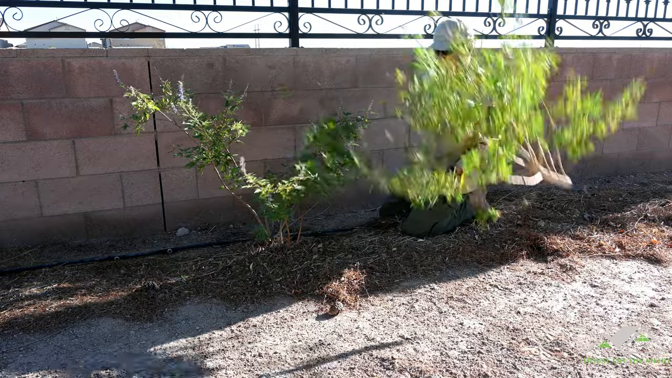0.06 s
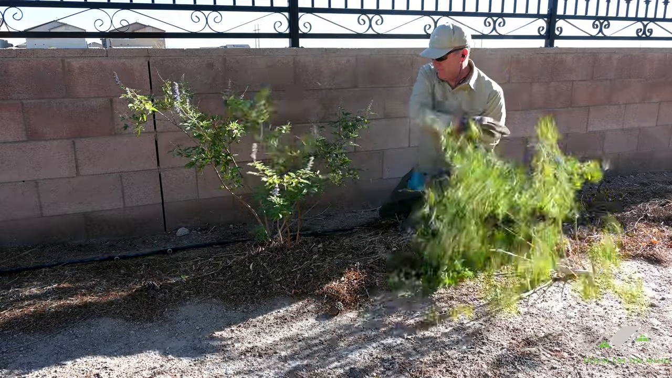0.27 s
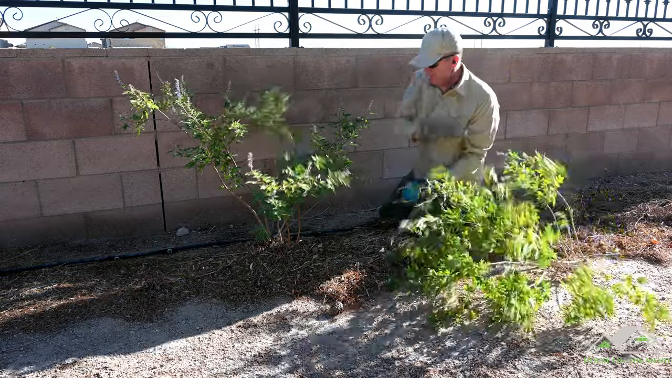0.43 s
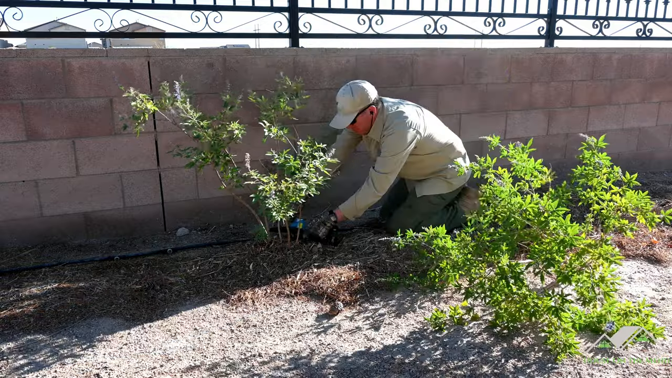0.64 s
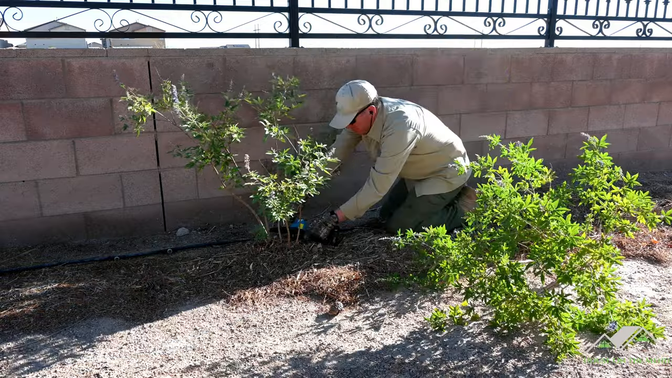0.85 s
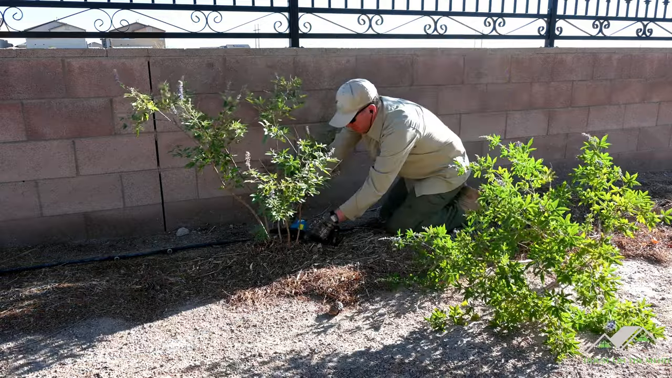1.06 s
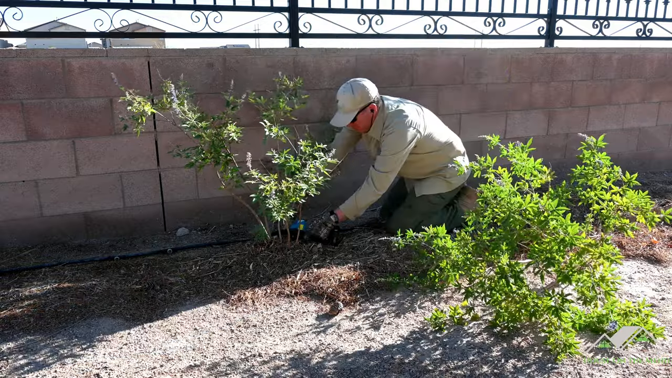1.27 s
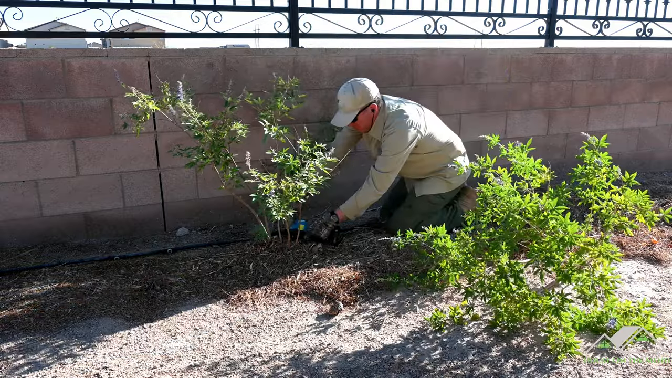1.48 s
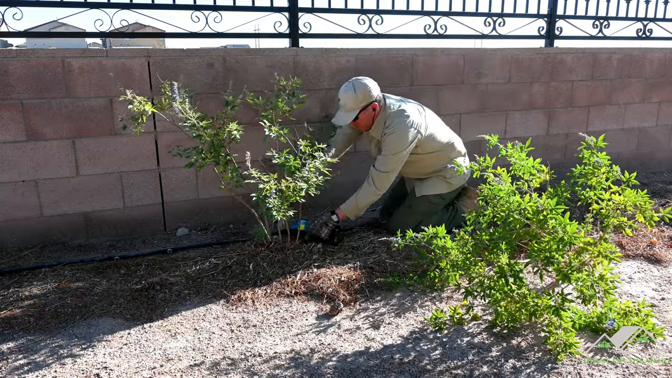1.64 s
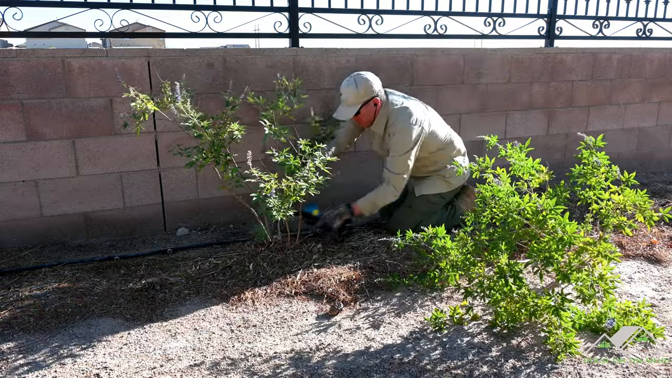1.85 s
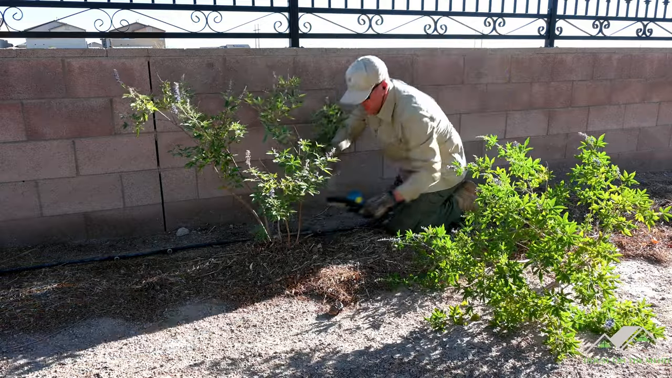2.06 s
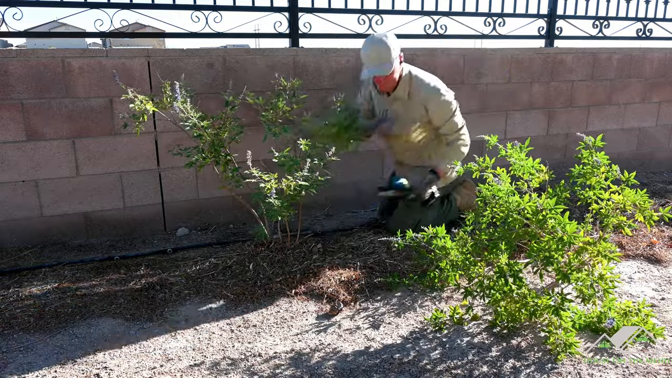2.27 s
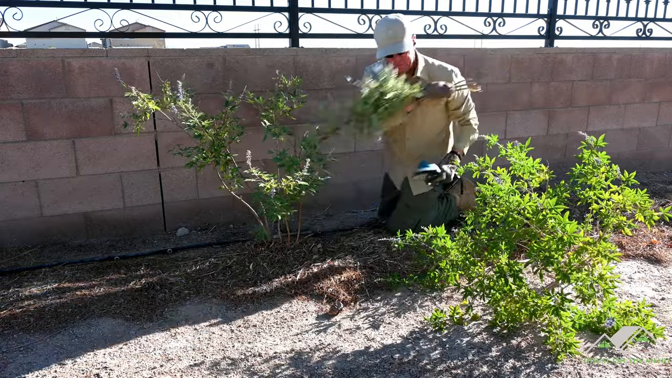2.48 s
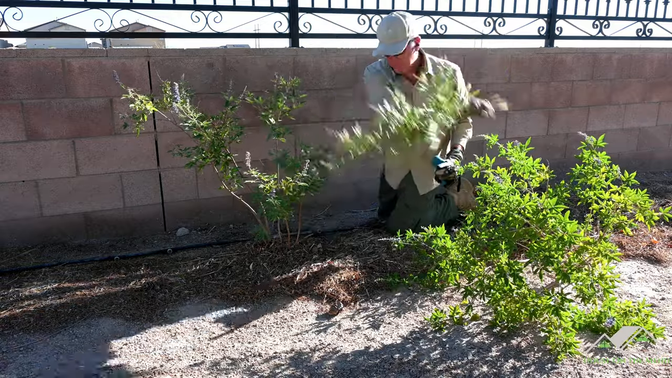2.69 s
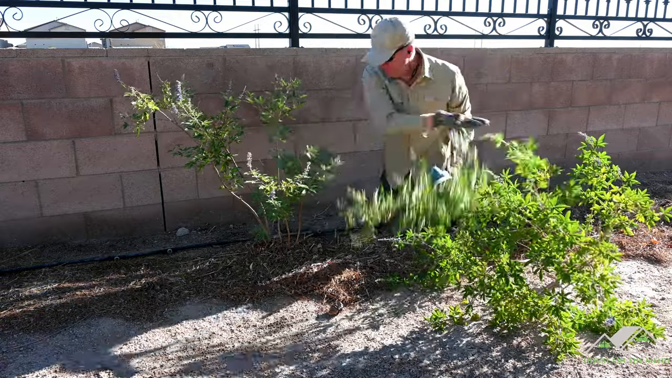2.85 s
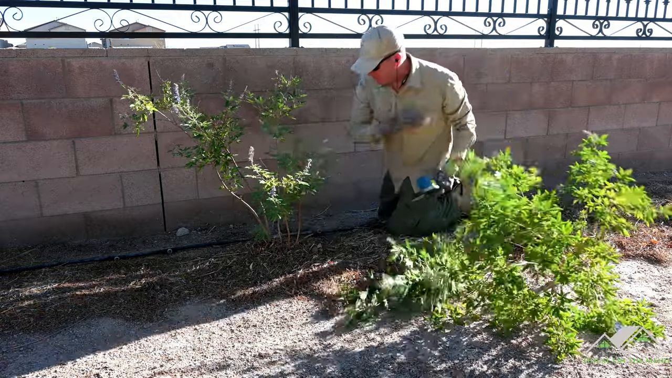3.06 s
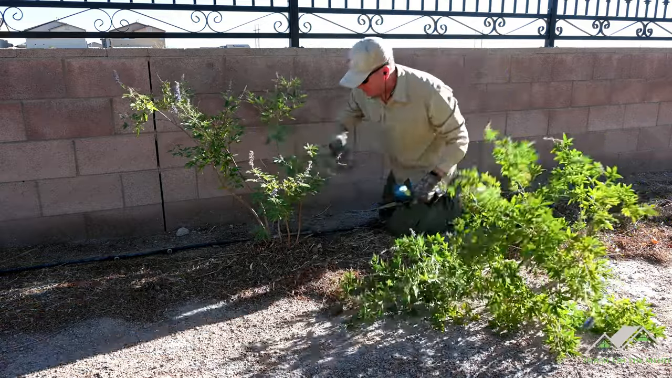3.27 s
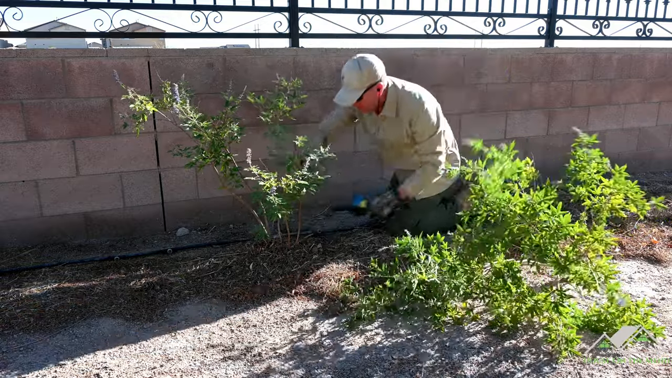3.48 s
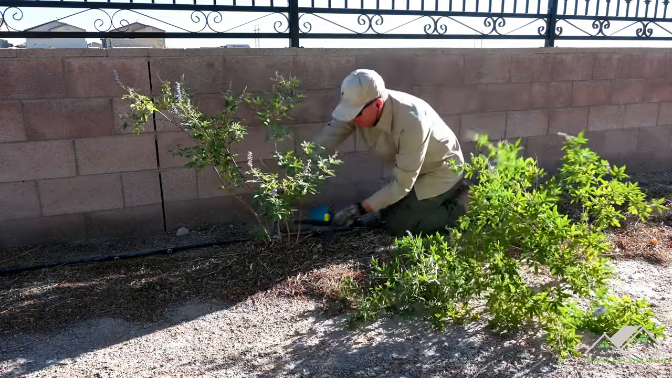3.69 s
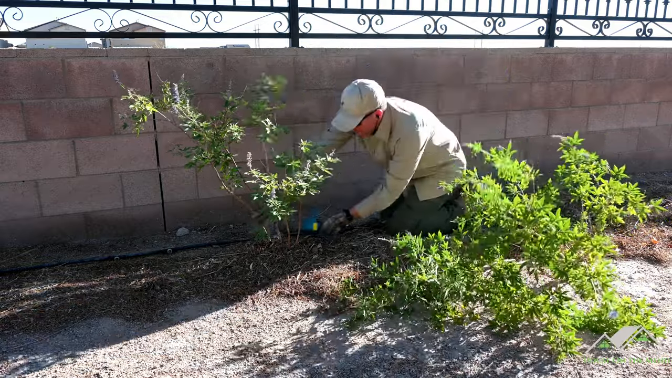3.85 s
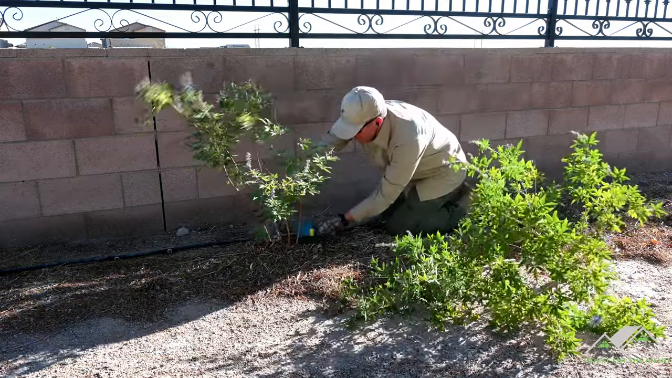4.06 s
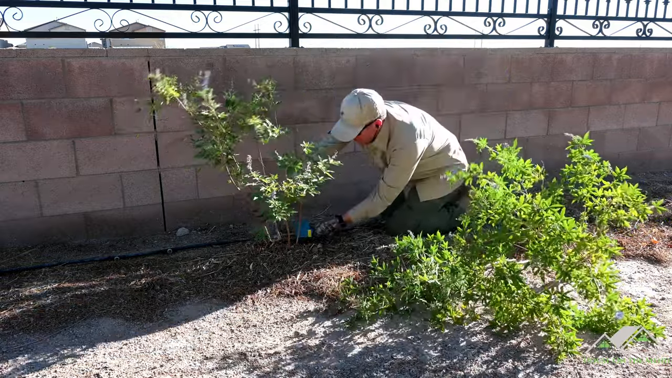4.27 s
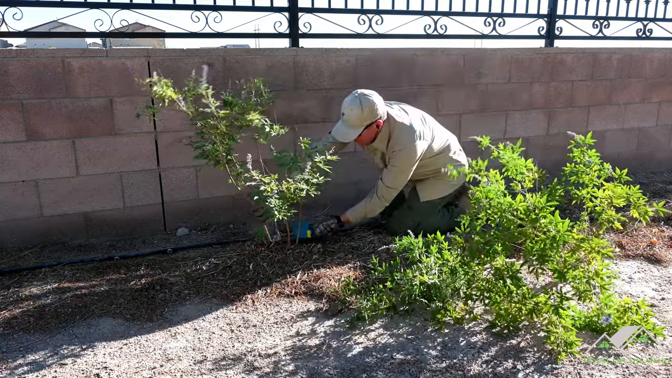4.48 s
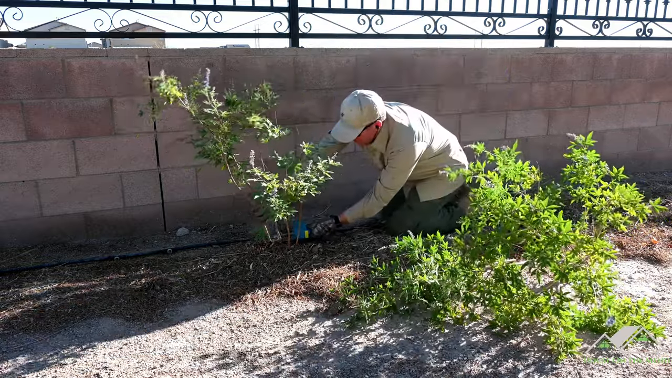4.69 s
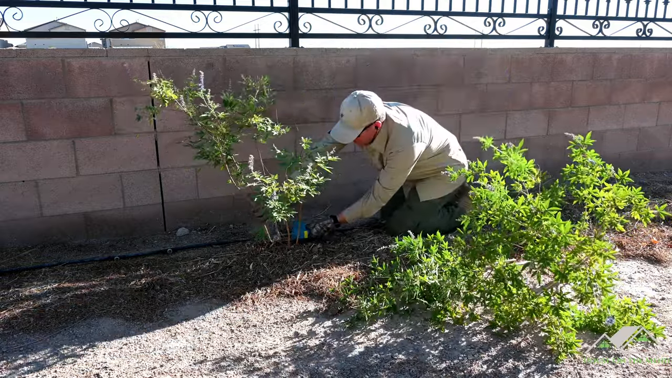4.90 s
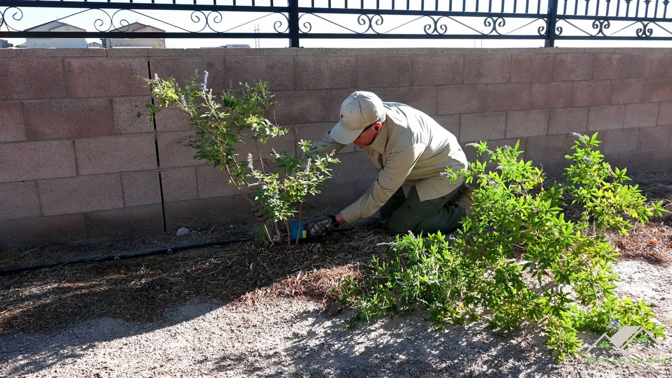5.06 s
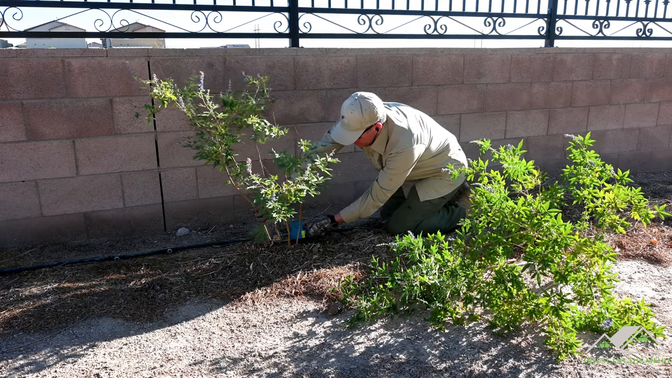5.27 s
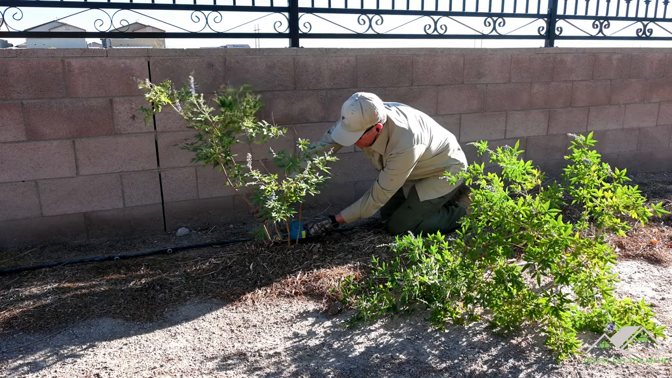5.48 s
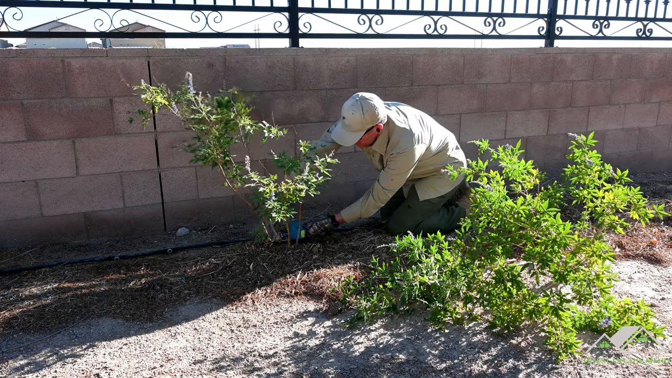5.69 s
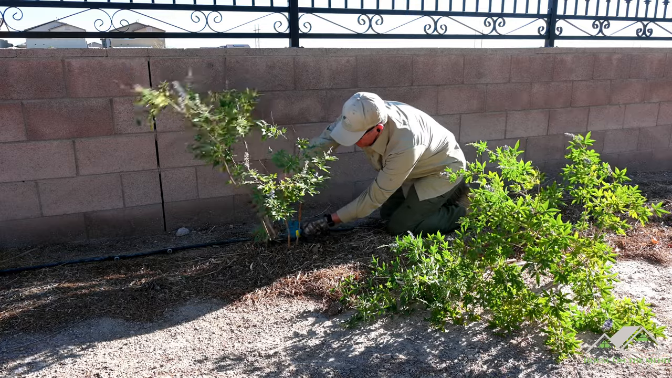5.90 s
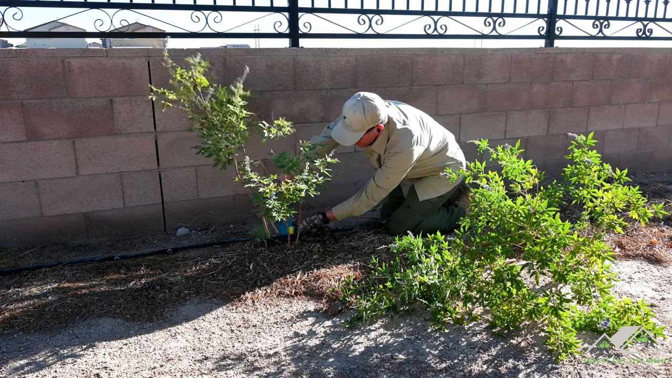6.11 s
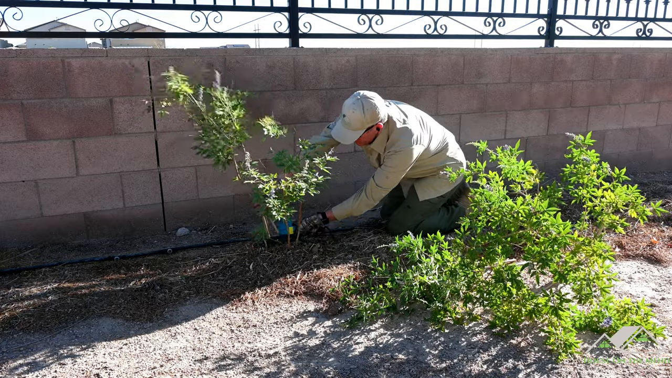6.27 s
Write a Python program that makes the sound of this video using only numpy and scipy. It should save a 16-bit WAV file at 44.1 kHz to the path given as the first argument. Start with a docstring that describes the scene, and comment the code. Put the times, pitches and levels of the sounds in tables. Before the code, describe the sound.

Outdoors, a branch drops with a soft rustle and a few twig knocks. A small electric chainsaw, several metres from the microphone, then cuts thin stems, its whine wavering and its chain clattering and snagging. It winds down to a stop, and more branches are tossed and brushed. A second burst follows, with sharp catches and a growing drone in the wood, over a faint hum of far traffic.

```python
"""Battery chainsaw by a block wall

A small saw cuts thin green stems in two bursts, a few metres from a mono microphone.
Drive links whine over the sprocket, the chain clatters round the bar, cutters bite and catch in wood.
Between the bursts the chain coasts to a stop, branches are thrown down and leaves rustle.
A town hums in the distance."""
import sys
import numpy as np
from scipy import signal
from scipy.fft import rfft, irfft, next_fast_len
from scipy.io import wavfile
from scipy.ndimage import uniform_filter1d, map_coordinates

SR = 44100
rng = np.random.default_rng(int(sys.argv[2]) if len(sys.argv) > 2 else 0)


def dump_mix(stems):
    """Bounce the given channels to the path in sys.argv[1] as a 16-bit WAV at rate SR."""
    frames = np.atleast_2d(stems).T  # one column per channel
    limited = np.clip(frames, -1, 1)  # hard clip at full scale
    pcm = np.round(limited * 32767).astype(np.int16)
    wavfile.write(sys.argv[1], SR, pcm)


N = 279594
T = np.arange(N) / SR


def saw():
    """The saw, a few metres off: whine, clatter and cutting all follow the chain speed."""
    link_hz, chain_db, whine_db, running = motor()
    cut, drone = wood_contact()
    link_phase = 2 * np.pi * np.cumsum(link_hz) / SR
    bite = np.clip((level(cut) - chain_db + 26.4) / 14, 0, 1)  # how deep the cutters are in wood
    clatter = amp(chain_db) * chain_clatter(link_hz, link_phase, bite)
    chatter = bark_skips(link_phase)
    tearing = cut * np.minimum(link_hz / 250, 1) * stem(grainy(500, spread_db=5, hiss=0.5))
    whine = link_whine(link_phase, whine_db, drone)
    return running * (whine + chatter + flares() + clatter + tearing)


# Trigger held, one list per burst: (time [s], link rate [Hz], chain [dB], whine [dB])
TRIGGER_BURSTS = [
    [(.636, 435, -21, -34), (.74, 500, -23.5, -34), (.83, 518, -24.5, -36), (.93, 545, -23, -33),
     (1.045, 488, -21.5, -36), (1.12, 518, -30, -35), (1.25, 520, -23.5, -30), (1.305, 490, -28.5, -43),
     (1.43, 512, -27, -37), (1.5, 495, -24, -38), (1.56, 512, -27, -38), (1.65, 546, -24.5, -35),
     (1.77, 546, -23.3, -33)],
    [(4.736, 280, -44, -45), (4.762, 345, -26, -36), (4.82, 455, -24, -37), (4.88, 512, -23, -30.5),
     (4.96, 537, -21.5, -29), (5.04, 526, -24.5, -43), (5.16, 518, -23, -31.5), (5.31, 510, -21, -31),
     (5.42, 534, -22.5, -31.5), (5.62, 547.5, -21.5, -29), (5.89, 549, -21.5, -28), (5.93, 525, -19, -35),
     (6.03, 505, -19, -35), (6.23, 503, -20, -33), (6.34, 470, -19.5, -35)],
]
def motor():
    """The chain is driven, coasts to a stop under drag and dry friction, then is driven again."""
    drag_s, friction_hz, stop_s = .99, 380, 2.52
    first, second = TRIGGER_BURSTS
    times, *columns = np.transpose(first + second)
    link_hz, chain_db, whine_db = (np.interp(T, times, column) for column in columns)
    off_s, off_hz, off_chain_db, off_whine_db = first[-1]
    coasting = (T > off_s) & (T < second[0][0])
    coast_hz = (off_hz + friction_hz) * np.exp((off_s - T) / drag_s) - friction_hz
    link_hz = np.where(coasting, np.maximum(coast_hz, 1), link_hz)
    slow_db = level(np.minimum(link_hz / 420, 1))  # a slow chain fades as a power of its speed
    chain_db = np.where(coasting, off_chain_db, chain_db) + 1.15 * slow_db
    whine_db = np.where(coasting, off_whine_db, whine_db) + 12 * slow_db
    start = uniform_filter1d(1. * (T >= first[0][0]), size=90)
    halt = np.clip((stop_s - T) / .15, 0, 1)
    return link_hz, chain_db, whine_db, np.where(coasting, halt, start)


# Link tone, motor shaft and overtone: (multiple of link rate, level [dB], blur [Hz])
WHINE_ORDERS = [(1, 1, 3.06), (.848, -10.5, 5), (2, -10.5, 5)]
# Cutter drone, left and right unalike: (multiple of link rate, level [dB], blur [Hz])
CUTTER_ORDERS = [(.25, -25.5, 4), (.5, -1, 3), (.75, -8, 5), (1.25, -7, 6)]
def link_whine(link_phase, whine_db, drone):
    """Links whine over the sprocket; in a cut, a cutter enters every second link and drones."""
    whine = amp(whine_db) * tones(link_phase, WHINE_ORDERS, waver_db=1.8)
    return whine + drone * tones(link_phase, CUTTER_ORDERS, waver_db=0)


# Gear and pole whistles: (multiple of link rate, level [dB], blur [Hz])
GEAR_ORDERS = [(3, -12, 5), (5, -14, 7), (8, -19, 8), (10.155, -10.5, 5), (10.155, -13, 200)]
# Hollow bands of saw, ground and wall in three postures: (centre [Hz], width [Hz], level [dB])
FIRST_CUT_BANDS = [(494, 117, -5), (880, 315, -7.5), (1290, 95, -8.5), (2040, 322, 0), (3200, 410, -1.5),
                   (4470, 620, -2.5), (5750, 580, -10.5), (7180, 1140, -12.5), (8830, 980, -10.5),
                   (11470, 770, -10.5), (13600, 1200, -20), (15200, 800, -23)]
LIFTED_BANDS = [(503, 144, 1.5), (1110, 410, 2), (1680, 410, -1), (2780, 330, 2), (3960, 810, -0.5),
                (5560, 800, -4), (8330, 1370, -4.5), (11000, 1500, -13), (14700, 740, -18)]
SECOND_CUT_BANDS = [(527, 126, -4), (1260, 290, -4), (1825, 180, 2), (2340, 140, -3), (2750, 210, -2.5),
                    (4040, 910, -11.5), (4910, 1100, -5.5), (6560, 550, -12), (7600, 500, -9.5),
                    (8980, 850, -11), (11240, 1700, -18.5), (13400, 900, -20.5), (15200, 800, -24)]
LOWERED_S, DULL_HZ = 3.5, 3000
def chain_clatter(link_hz, link_phase, bite):
    """The chain rattles round the bar, coloured at the microphone by how the saw is held."""
    slow = np.clip((515 - link_hz) / 120, 0, 1)
    crawling = np.clip((220 - link_hz) / 120, 0, 1)
    pair_phase = link_phase / 4  # a left-right pair of cutters passes every four links
    throb = 1 + 0.16 * np.cos(link_phase) + 0.13 * bite * np.cos(pair_phase + 1.1 * wobble(12))
    throb += .3 * crawling * np.cos(pair_phase + wobble(20))  # single cutters near the stop
    rattle = grainy(9000, spread_db=2.5, hiss=1.52) * throb * amp((.5 + .5 * bite) * wobble(60))
    whistle_db = -5.5 - 8.5 * bite - 14 * slow  # wood and low speed damp the whistles
    rattle += amp(whistle_db) * tones(link_phase, GEAR_ORDERS, waver_db=3.2)
    lift = np.clip((T - 1.75) / 0.35, 0, 1)
    first = (1 - lift) * banded(rattle, FIRST_CUT_BANDS) + lift * banded(rattle, LIFTED_BANDS)
    clatter = np.where(T < LOWERED_S, first, banded(rattle, SECOND_CUT_BANDS))
    treble = filtered(clatter, lambda hz: 1j * hz / (DULL_HZ + 1j * hz))
    return clatter - .5 * crawling * treble


# Chain held against wood: (start [s], end [s], cutting [dB], drone on entry [dB], drone on exit [dB])
WOOD_CUTS = [(.636, .81, -43, -33, -45), (.94, 1.07, -40, -42, -36), (1.15, 1.24, -56, -45, -43),
             (1.24, 1.34, -42, -46, -46), (1.34, 1.48, -57, -43, -43), (1.48, 1.55, -41, -46, -46),
             (4.81, 5.41, -42, -44, -35), (5.905, 6.34, -34, -29, -24)]
def wood_contact():
    """Gains of cutting noise and cutter drone; every catch adds a short surge of tearing."""
    enter_s, leave_s = .008, .05  # per 20 dB
    cut, drone = amp(-57), 0  # running free
    for start, end, cut_db, entry_db, exit_db in WOOD_CUTS:
        pressed = amp(-20 * np.maximum((start - T) / enter_s, (T - end) / leave_s).clip(0))
        cut += amp(cut_db) * pressed
        drone += amp(np.interp(T, [start, end], [entry_db, exit_db])) * pressed
    surges = amp(-21) * burst(np.array(CUTTER_CATCHES)[:, :2], rise=.01, t60=.25)
    return cut + surges, drone


# Cutters catching in the wood: (time [s], thump [dB], crack [dB], ring [Hz])
CUTTER_CATCHES = [(0.641, -15, -13, 487), (0.764, -11.5, -11, 456), (0.936, -18, -8, 528),
                  (0.952, -15, -18, 540), (0.999, -28, -14, 520), (1.03, -19, -20, 500),
                  (1.046, -12.5, -11, 452), (1.107, -37, -20, 511), (1.253, -14.5, -13, 517),
                  (1.285, -20, -16, 480), (1.32, -18.5, -15, 458), (1.437, -40, -10, 455),
                  (1.486, -15.5, -20, 372), (1.523, -16.5, -18, 370), (2.232, -45, -22, 600),
                  (4.807, -26, -11, 500), (4.857, -22, -14, 560), (4.908, -22, -14, 526),
                  (4.96, -21, -14, 532), (4.984, -24, -9, 520), (4.999, -18, -8, 650),
                  (5.012, -16, -16, 700), (5.064, -18.5, -22, 502), (5.105, -19, -11, 450),
                  (5.133, -21, -10.5, 505), (5.152, -15.5, -7, 515), (5.29, -30, -12, 500),
                  (5.319, -15, -16, 436), (5.348, -19, -7, 426), (5.383, -14, -11, 800),
                  (5.907, -21, -24, 546), (5.923, -28, -11, 560), (5.952, -16, -30, 636),
                  (6.284, -17, -14, 589), (6.332, -14, -14, 622)]
def catches():
    """A catching cutter thumps and rings the stem and cracks fibres; a low thud comes with each crack."""
    rings, t = np.zeros(N + SR), np.arange(SR // 8) / SR
    for s, db, _, hz in CUTTER_CATCHES:
        envelope = amp(db - 60 * t / 0.05) * (1 - np.exp(-t / 0.002))
        overtone = 0.25 * amp(-60 * t / 0.035) * np.sin(2 * np.pi * 2.38 * hz * t)
        rings[round(s * SR):][:len(t)] += envelope * (np.sin(2 * np.pi * hz * t) + overtone)
    rows = np.array(CUTTER_CATCHES)
    thump = burst(rows[:, :2], rise=0.0064, t60=0.052) * stem(rng.standard_normal(N))
    fibres = filtered(rng.standard_normal(N), lambda hz: 1 / (1 + 1j * hz / 6500))  # green wood is dull
    fibres = np.where(T < LOWERED_S, banded(fibres, FIRST_CUT_BANDS), banded(fibres, SECOND_CUT_BANDS))
    crack = burst(rows[:, [0, 2]], rise=0.002, t60=0.024) * fibres
    low_thud = amp(-23) * burst(rows[:, [0, 2]], rise=.006, t60=.042)
    return rings[:N] + thump + crack + low_thud


# Resonances of the cut stem: (centre [Hz], width [Hz], level [dB])
STEM_MODES = [(239, 56, 2), (379, 40, 1), (624, 350, -0.5), (1230, 290, -8.5)]
def stem(force):
    """A shaken stem rings, too thin to radiate deep bass; at rms 1."""
    def response(hz):
        return sum((-1) ** k * amp(db) * 1j * hz * width / (centre ** 2 - hz ** 2 + 1j * hz * width)
                   for k, (centre, width, db) in enumerate(STEM_MODES))
    return unit(low_cut(filtered(force, response), corner_hz=90))


# Runs of skips that build to a sudden end: (peak [s], level [dB], time to build 20 dB [s])
SKIP_RUNS = [(1.111, -20.5, .018), (1.235, -32, .3), (1.292, -22.5, .14), (1.362, -28, .1),
             (1.412, -28, .15), (1.449, -22, .035), (1.54, -31, .3)]
# The guide bar's answer to a skip: (centre [Hz], width [Hz], level [dB])
BAR_BANDS = [(3350, 320, 4), (4800, 400, -1), (2100, 300, -9), (6600, 900, -13), (11700, 700, -11)]
def bark_skips(link_phase):
    """Cutters skip on the bark, one short scrape per pair, and shake the guide bar."""
    scrape_t60, run_fall_s = .009, .012
    pairs_passed = np.floor(link_phase / (8 * np.pi) + .06 * wobble(90))
    skips = np.diff(pairs_passed, prepend=0) * amp(1.8 * rng.standard_normal(N))
    scrapes = signal.lfilter([1], [1, -amp(-60 / (scrape_t60 * SR))], skips)
    runs = swells([(*row, run_fall_s) for row in SKIP_RUNS])
    return runs * banded(scrapes * rng.standard_normal(N), BAR_BANDS)


# Hollow bands: (peak [s], centre [Hz], sink [Hz/s], width [Hz], level [dB], 20 dB rise or fall [s])
SINKING_BANDS = [(1.86, 4600, 4500, 160, -28.5, .12), (1.92, 2950, 2500, 500, -30, .16),
                 (1.95, 4300, 2500, 400, -34, .12), (1.955, 1160, 1800, 30, -34, .1),
                 (1.94, 1600, 1500, 150, -37, .1), (2.045, 3800, 2000, 700, -28, .15),
                 (2.1, 8800, 5000, 700, -35, .16), (2.13, 1060, 300, 110, -34, .15),
                 (2.23, 2650, 1200, 250, -38, .1), (2.35, 1300, 600, 200, -44, .12)]
def flares():
    """As the saw coasts and is lifted, one noise band after another flares and sinks in pitch."""
    bands = np.zeros(N)
    for s, hz, sink, width_hz, db, rise in SINKING_BANDS:
        phase = 2 * np.pi * (hz * (T - s) - sink * (T - s) ** 2 / 2)
        noise = unit(wobble(width_hz) * np.cos(phase) + wobble(width_hz) * np.sin(phase))
        bands += swells([(s, db, rise, rise)]) * noise
    return bands


# Branches thrown, dragged and brushed: (peak [s], wood [dB], leaves [dB], time to rise 20 dB [s])
BRANCH_MOVES = [(.05, -46, -52, .5), (.27, -45, -49, .2), (.45, -50, -53, .8), (2.43, -46, -48, .4),
                (2.95, -50, -51, .3), (3.06, -48, -50, .08), (3.46, -46.5, -48.5, .7), (3.95, -53, -66, .5),
                (4.17, -60, -60, .1), (4.68, -58, -63, .5)]
# Spectra of wood and leaves: (frequency [Hz], density [dB])
WOOD_SPECTRUM = [(71, -37), (120, -16), (241, -5), (367, -5.5), (396, -5), (558, -2.5), (2500, -24),
                 (3250, -32), (5500, -120)]
LEAF_SPECTRUM = [(710, -20), (1200, -5.5), (1950, -11.5), (2600, -8), (5770, -11.5), (11700, -27),
                 (14700, -33), (15700, -46)]
def branches():
    """Dull wood noise and leaf crackle shake together, settling more slowly than they rise."""
    wood = swells([(s, db, rise, 1.5 * rise) for s, db, _, rise in BRANCH_MOVES])
    leaves = swells([(s, db, rise, 1.5 * rise) for s, _, db, rise in BRANCH_MOVES])
    shake = wobble(29.98)
    wood *= amp(0.76 * shake) * coloured(grainy(600, spread_db=3, hiss=3.0), WOOD_SPECTRUM)
    leaves *= amp(0.37 * shake + 0.68 * wobble(90))
    leaves *= coloured(grainy(900, spread_db=5, hiss=1.1), LEAF_SPECTRUM)
    return wood + leaves


# Single twigs: (time [s], knock [dB], snap [dB], pitch [Hz])
TWIG_KNOCKS = [(0.266, -28, -38, 620), (0.279, -31, -39, 360), (0.3, -28.5, -39, 482),
               (2.639, -41, -41, 579), (2.686, -29.5, -54, 520), (2.964, -30, -37, 990),
               (2.974, -33, -36, 338), (3.039, -39, -44, 622), (3.474, -35, -54, 575),
               (3.599, -37, -53, 514), (3.671, -34, -53, 1090), (3.926, -30, -48, 445),
               (4.006, -28, -47, 860), (4.186, -42, -43, 428), (4.584, -46, -47, 506)]
def twigs():
    """Twigs knock and snap; stray dry leaves tick at random."""
    knocks, t = np.zeros(N + SR), np.arange(SR // 10) / SR
    for s, db, _, hz in TWIG_KNOCKS:
        phase = 2 * np.pi * hz * t
        modes = np.sin(phase) + 0.46 * np.sin(1.655 * phase) + 0.3 * np.sin(2.6 * phase)
        knocks[round(s * SR):][:len(t)] += amp(db - 60 * t / 0.016) * modes
    ticks = rng.uniform([0, -60], [T[-1], -50], (round(14 * N / SR), 2))  # (time [s], level [dB])
    snaps = burst(np.vstack([np.array(TWIG_KNOCKS)[:, [0, 2]], ticks]), rise=.0004, t60=0.019)
    crackle = coloured(rng.standard_normal(N), [(1500, -22), (3500, 3), (7000, 2), (15000, -12)])
    return knocks[:N] + snaps * crackle


def wall_scatter(x):
    """Wall and ground send a short dull scatter to the microphone after the direct sound."""
    t = np.arange(SR // 4) / SR
    tail = uniform_filter1d(rng.standard_normal(len(t)), size=4) * amp(-60 * t / 0.04) * (t > .004)
    return x + amp(-18.5) * signal.fftconvolve(x, tail / np.linalg.norm(tail))[:N]


# Distant traffic as it reaches the yard: (frequency [Hz], density [dB])
TRAFFIC_SPECTRUM = [(18, -76), (30, -48), (83, -2.5), (141, -0.5), (238, -7), (285, -10), (508, -9.5),
                    (772, -15), (835, -7.5), (1030, -16), (15700, -31)]
# Faint tones far off: (start [s], end [s], pitch [Hz], level [dB])
DISTANT_TONES = [(.07, .24, 296, -58), (0.41, 0.64, 298, -58), (3.75, 4.697, 855, -68),
                 (3.9, 4.697, 953, -70)]
def town():
    """Far traffic hums behind everything, with a few faint tones of steady pitch."""
    hum = amp(-53.5 + .8 * wobble(2.92)) * coloured(rng.standard_normal(N), TRAFFIC_SPECTRUM)
    for start, end, hz, db in DISTANT_TONES:
        gate = np.clip(np.minimum(T - start, end - T) / 0.017, 0, 1)
        hum += amp(db + 3 * wobble(12)) * gate * np.sin(2 * np.pi * hz * T)
    return hum


def amp(db):
    """Gain of a level in dB."""
    return 10 ** (np.asarray(db) / 20)


def level(gain):
    """Level of a gain in dB."""
    return 20 * np.log10(gain + 1e-9)


def unit(x):
    """x at rms 1."""
    return x / np.sqrt(np.mean(x ** 2) + 1e-20)


def wobble(rate):
    """A smooth random curve, rate knots a second."""
    return map_coordinates(rng.standard_normal(int(N * rate / SR) + 4), [T * rate])


def filtered(x, response):
    """x times a complex response of frequency."""
    size = next_fast_len(N + SR // 2)
    return irfft(rfft(x, size) * response(np.fft.rfftfreq(size, 1 / SR)), size)[..., :N]


def low_cut(x, corner_hz):
    """x through a two-pole high-pass."""
    return filtered(x, lambda hz: (1j * hz / (corner_hz + 1j * hz)) ** 2)


def coloured(x, points):
    """x through a spectrum of (frequency [Hz], level [dB]) points, at rms 1."""
    f, db = np.transpose(points)
    return unit(filtered(x, lambda hz: amp(np.interp(np.log(hz + 1), np.log(f), db))))


def banded(x, bands):
    """x through bell-shaped bands, at rms 1."""
    def response(hz):
        return np.sqrt(sum(amp(2 * db) * np.exp(-((hz - f) / width) ** 2) for f, width, db in bands))
    return unit(filtered(x, response))


def grainy(per_s, spread_db, hiss):
    """White noise made of random clicks of uneven size over a share of smooth hiss."""
    hits = rng.random(N) < per_s / SR
    clicks = hits * amp(spread_db * rng.standard_normal(N)) * rng.standard_normal(N)
    return unit(unit(clicks) + hiss * rng.standard_normal(N))


def tones(phase, orders, waver_db):
    """Blurred sines on multiples of a phase."""
    total = np.zeros(N)
    for multiple, db, blur_hz in orders:
        gain = amp(db + waver_db * wobble(25))
        drift = 2 * np.pi * np.cumsum(blur_hz * wobble(40 + 2 * blur_hz)) / SR
        total += gain * np.sin(multiple * phase + drift)
    return total


def burst(rows, rise, t60):
    """Envelope that swells and dies at each (time [s], level [dB])."""
    marks, t = np.zeros(N), np.arange(SR // 2) / SR
    np.add.at(marks, np.round(rows[:, 0] * SR).astype(int), amp(rows[:, 1]))
    return signal.fftconvolve(marks, (1 - np.exp(-t / rise)) * amp(-60 * t / t60))[:N]


def swells(rows):
    """Envelope of (peak [s], level [dB], 20 dB rise [s], 20 dB fall [s]) swells."""
    return np.sqrt(sum(amp(2 * db - 40 * np.where(T < s, (s - T) / rise, (T - s) / fall))
                       for s, db, rise, fall in rows))


def scene():
    """Saw, branches and far town reach one microphone in the yard."""
    mono = saw() + wall_scatter(catches() + branches() + twigs()) + town()
    return np.array([mono, mono])


def record(dry):
    """The microphone drops the deep bass and the highest treble; loud peaks are rounded off."""
    ceiling, top_hz = .7, 15760
    x = low_cut(dry, corner_hz=90)
    rounded = x / (1 + np.abs(x / ceiling) ** 4) ** .25
    return filtered(rounded, lambda hz: hz < top_hz)


dry = scene()
out = record(dry)
dump_mix(out)
```